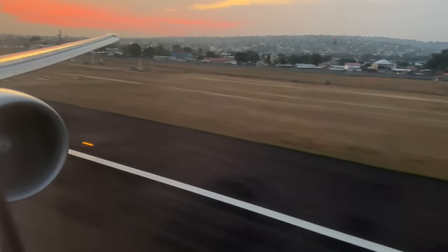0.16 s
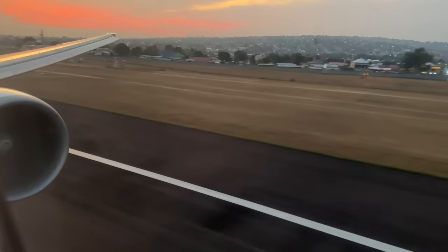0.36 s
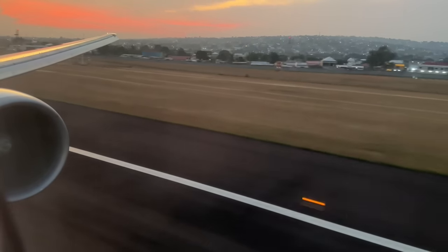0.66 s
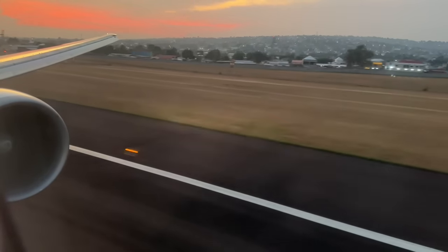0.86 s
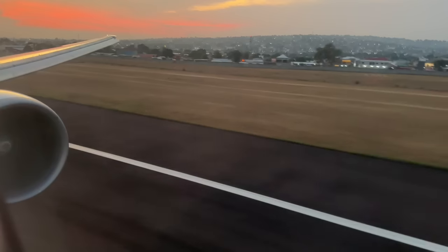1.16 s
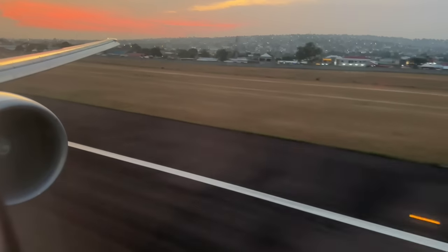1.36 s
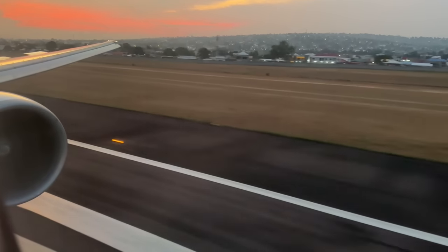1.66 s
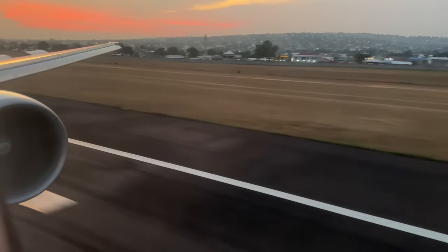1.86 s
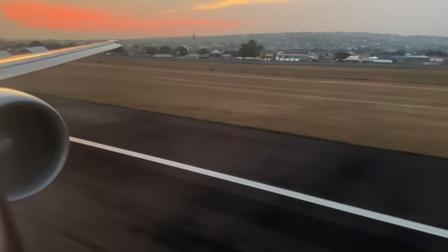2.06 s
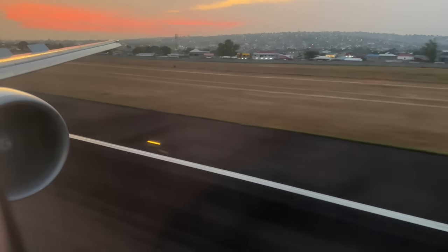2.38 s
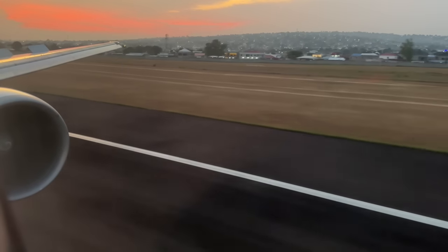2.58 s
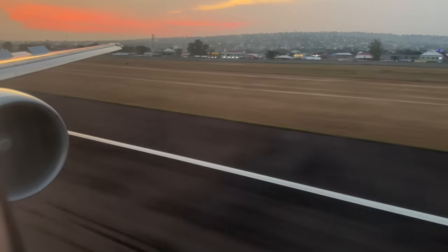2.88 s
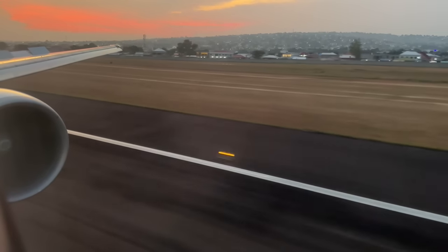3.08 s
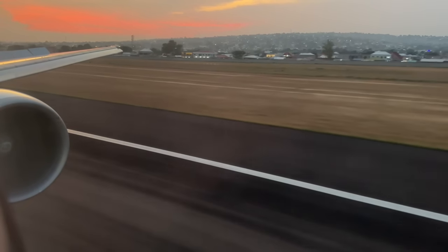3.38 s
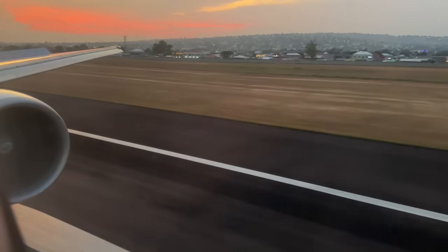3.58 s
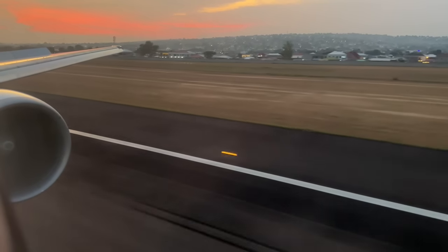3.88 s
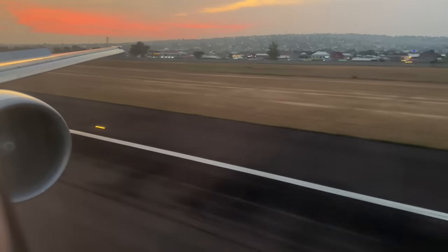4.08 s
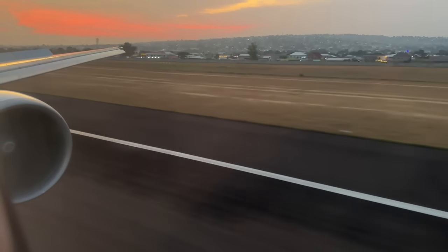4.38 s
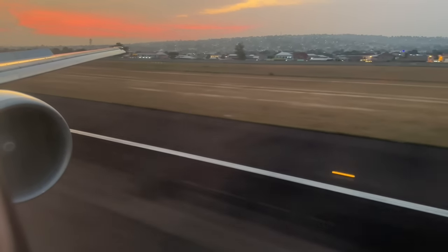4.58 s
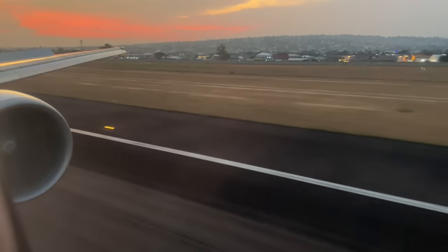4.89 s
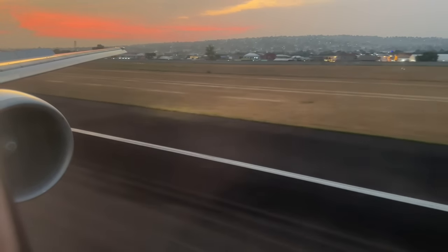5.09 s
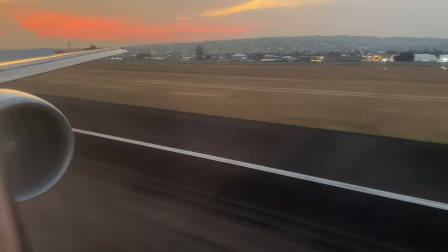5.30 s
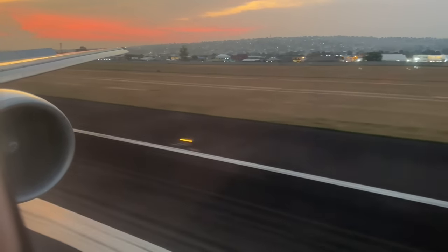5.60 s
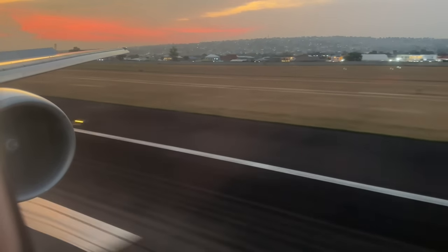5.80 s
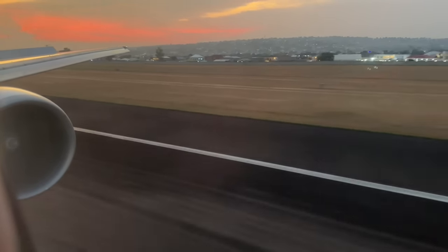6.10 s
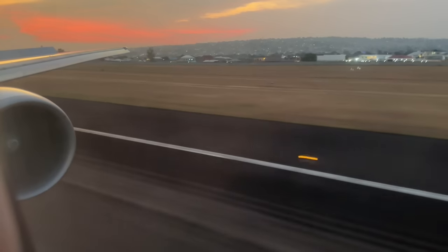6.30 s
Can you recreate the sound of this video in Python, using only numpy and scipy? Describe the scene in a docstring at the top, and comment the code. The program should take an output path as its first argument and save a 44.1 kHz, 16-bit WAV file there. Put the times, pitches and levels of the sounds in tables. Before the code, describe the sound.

A passenger jet rolls along the runway, heard from a window seat as a loud, steady low rumble with rushing air. Faint engine whines sink and fade over a thin electric tone and low hums. Plastic trim ticks, clacks and squeaks throughout. Early on, a rough stretch swells the rumble and rattling, then a loose panel knocks sharply once. Another rough stretch shakes the cabin near the end.

```python
"""Jet rollout from a window seat

After landing, the wheels rumble through the fuselage and air rushes by. The engine's whines sink and
fade over a steady electric tone and low hums. Rough stretches of runway swell the rumble and hiss and
make the cabin trim chatter, tick, clack and squeak. Once, a loose panel knocks sharply."""
import sys
import numpy as np
from scipy import signal
from scipy.fft import rfft, irfft, next_fast_len
from scipy.io import wavfile
from scipy.ndimage import uniform_filter1d, minimum_filter1d, map_coordinates

SR = 44100
rng = np.random.default_rng(int(sys.argv[2]) if len(sys.argv) > 2 else 0)


def put_to_file(sound):
    """Save the sound as 16-bit audio at rate SR, in the file named by the first command-line argument."""
    columns = np.atleast_2d(sound).T  # one column per channel
    safe = np.clip(columns, -1, 1)
    whole_steps = np.round(safe * 32767)
    wavfile.write(sys.argv[1], SR, whole_steps.astype(np.int16))


N = 284445
TOP_HZ = 15900

# stereo balance at the seat: f/Hz, left minus right/dB
BALANCE = [(60, -0.5), (110, -1), (200, -3), (380, -2), (700, -5.5), (1290, -7.5), (2380, -2), (4400, -9.5),
           (8120, -1), (15000, 1.5)]
# resonances of the plastic trim: f/Hz, width/Hz, gain/dB
PLASTIC_MODES = [(980, 170, 8), (1200, 160, 6), (1640, 220, 6), (2330, 120, -1), (2730, 400, -3),
                 (3900, 700, -5), (5500, 1500, -13), (8200, 1500, -20)]


def amp(db):
    """Decibels to gain."""
    return 10 ** (np.asarray(db) / 20)


def along(points, hz):
    """Read (f/Hz, value) points on a log axis."""
    f, v = np.transpose(points)
    return np.interp(np.log(hz + 1), np.log(f + 1), v)


def curves(rows):
    """One automation curve for each column after the time."""
    times, *cols = np.transpose(rows)
    return [np.interp(np.arange(N) / SR, times, col) for col in cols]


def swells(rows):
    """Smooth humps from rows of middle/s, half length/s, height."""
    t = np.arange(N) / SR
    return sum(height * np.exp(-((t - middle) / half) ** 2) for middle, half, height in rows)


def wobble(rate, size=N):
    """A smooth random curve, rate knots a second."""
    knots = rng.standard_normal(int(size * rate / SR) + 4)
    return map_coordinates(knots, [np.arange(size) * rate / SR])


def filtered(x, response):
    """Filter x with a complex response of frequency."""
    m = next_fast_len(N + SR // 2)
    return irfft(rfft(x, m) * response(np.fft.rfftfreq(m, 1 / SR)), m)[..., :N]


def ring(x, hz, q):
    """Pass x twice through one resonance."""
    b, a = signal.iirpeak(hz, q, fs=SR)
    return signal.lfilter(b, a, signal.lfilter(b, a, x))


def shell(x, modes):
    """Ring a plastic part: x drives its modes, which alternate in polarity."""
    return filtered(x, lambda hz: sum(
        (-1) ** k * amp(db) * 1j * hz * width / (centre ** 2 - hz ** 2 + 1j * hz * width)
        for k, (centre, width, db) in enumerate(modes)))


def add(track, s, sound):
    """Mix a sound into a track at time s."""
    part = track[:, max(round(s * SR), 0):][:, :sound.shape[-1]]
    part += sound[..., :part.shape[-1]]


def spread(pair, spectrum):
    """Colour a stereo pair and lean it mostly right; its mid comes out at rms 1."""
    def response(hz):
        db = along(spectrum, hz) + np.outer([.5, -.5], along(BALANCE, hz))
        return amp(db) * (hz < 2 * spectrum[-1][0])
    field = filtered(pair, response)
    return field / np.std(field.mean(0))


def low_noise(spectrum, evenness):
    """Low noise, nearly alike on both sides; evenness 0-1 steadies its slow chance swells."""
    # likeness of left and right: f/Hz, correlation
    likeness = [(60, .997), (130, .975), (290, .85), (420, .7)]
    def width(hz):
        angle = np.arccos(along(likeness, hz)) / 2
        return np.array([np.cos(angle), np.sin(angle)])
    mid, side = filtered(rng.standard_normal((2, N)), width)
    field = spread(np.array([mid + side, mid - side]), spectrum)
    power = np.abs(uniform_filter1d(field.mean(0) ** 2, size=SR // 7))
    return field / (power + 1e-9) ** (evenness / 2)


def in_cabin(sound, wet_db=-10, left_db=-3, lead_s=.00041):
    """A sound reaches the left microphone first, then scatters off seats and wall."""
    # cabin reverb decay: f/Hz, t60/s
    decay = [(300, 0.028), (4000, 0.22), (9000, 0.14), (15000, 0.0078)]
    hz, t, bands = signal.stft(rng.standard_normal((2, SR // 5)), SR, nperseg=256)
    tail = signal.istft(bands * amp(-60 * t / along(decay, hz)[:, None]), SR, nperseg=256)[1]
    paths = amp(wet_db) * tail / np.linalg.norm(tail[0])
    paths[0, 0] += 1
    paths[1, round(lead_s * SR)] += 1
    return signal.fftconvolve(sound[None], paths, axes=1) * amp([[left_db / 2], [-left_db / 2]])


def roughness():
    """How rough the runway is under the wheels: each stretch swells and passes."""
    # rough stretches: middle/s, half length/s, roughness (0 smooth, about 1 rough)
    patches = [(0.545, 0.14, 0.46), (1.29, 0.27, 0.84), (6.283, 0.17, 1.12)]
    return swells(patches)


def air(smooth_db=-38, rough_rise_db=4.5, fall_db_per_s=.03, direct=.35, lead_s=.00041):
    """Airflow and runway hiss fill the cabin; a part comes straight from the wall, left side first."""
    # colour of the rushing air: f/Hz, relative level/dB
    colour = [(240, -19.5), (400, -5.5), (540, -5.5), (983, -9), (1090, -14.5), (1330, -11), (1860, -20),
              (2120, -17), (2290, -20), (2580, -17.5), (3130, -24), (4750, -26.5), (6760, -37),
              (8110, -32.5), (9000, -37.5), (11700, -102), (19800, -120)]
    air_db = smooth_db - fall_db_per_s * np.arange(N) / SR + rough_rise_db * roughness()
    wall = rng.standard_normal(N)
    pair = rng.standard_normal((2, N)) + direct * np.array([wall, np.roll(wall, round(lead_s * SR))])
    gust_db = .6 * wobble(9)
    return amp(air_db + gust_db) * spread(pair, colour)


def electric_tone(hz=2158, trim_db=-1):
    """A thin electric tone holds its pitch and shimmers between the sides."""
    # the tone's fader ride: t/s, level before trim/dB
    ride = [(0, -53.5), (2.1, -53.5), (2.8, -51.5), (4.6, -54.5), (6.45, -53.5)]
    db = curves(ride)[0] + trim_db + 2 * wobble(8)
    shimmer_db = 2 * np.array([wobble(25), wobble(25)])
    phase = 2 * np.pi * hz * np.arange(N) / SR + .5 * wobble(22)
    return amp(db + shimmer_db) * np.sin(phase) * amp([[-1.5], [1.5]])


def engine_whines(fade_s=.063, waver_hz=7, flutter_db=1.8):
    """Engine tones flutter as they run down, cutting in and out."""
    # sinking whines: start/s, end/s, start f/Hz, end f/Hz, start level/dB, end level/dB
    glides = [(.3, 1.65, 4375, 4246, -55, -50), (2.15, 3.1, 4195, 4122, -51, -53),
              (-.1, .27, 3582, 3520, -41.5, -46), (.21, .53, 3522, 3503, -45, -49),
              (.33, 1.25, 3114, 3092, -45.5, -56), (.29, .68, 2720, 2710, -45, -49),
              (.7, 1.05, 2712, 2706, -53, -52), (2.4, 4.4, 2526, 2522, -58, -59)]
    t, out = np.arange(N) / SR, np.zeros((2, N))
    for start, end, from_hz, to_hz, from_db, to_db in glides:
        hz = np.interp(t, [start, end], [from_hz, to_hz])
        phase = 2 * np.pi * np.cumsum(hz + waver_hz * wobble(60)) / SR
        gate = np.clip(np.minimum(t - start, end - t) / fade_s, 0, 1)
        db = np.interp(t, [start, end], [from_db, to_db]) + flutter_db * wobble(45)
        for ear in range(2):
            out[ear] += amp(db + wobble(30)) * gate * np.sin(phase + ear * hz / 3000)
    return out * amp([[-1.5], [1.5]])


def hums(waver_db=2):
    """Clean low tones swell and fade in the fuselage as the jet slows."""
    # fuselage tones: start/s, loudest/s, end/s, start f/Hz, end f/Hz, level/dB
    tones = [(-2, .4, 2.3, 350, 346, -29.5), (-.2, .4, .95, 400, 394, -36),
             (1.55, 1.95, 2.7, 277, 277, -26), (1.9, 2.4, 2.8, 296, 295, -30),
             (2.6, 3.7, 4.2, 277, 270, -30), (2.5, 3.2, 3.7, 401, 400, -37.5),
             (2.9, 3.35, 3.7, 386, 383, -35.5), (3.7, 4.15, 4.5, 362, 359, -34),
             (4.0, 4.75, 5.2, 252, 251, -30)]
    t, out = np.arange(N) / SR, np.zeros(N)
    for start, loudest, end, from_hz, to_hz, db in tones:
        phase = 2 * np.pi * np.cumsum(np.interp(t, [start, end], [from_hz, to_hz])) / SR
        swell = np.sin(np.pi / 2 * np.interp(t, [start, loudest, end], [0, 1, 0]))
        out += amp(db + waver_db * wobble(11)) * swell * np.sin(phase)
    return out * amp([[-1.2], [1.2]])


def shaking(smooth_db=-53.5, rough_rise_db=3.5, flicker_db=3, attack_s=.012, fall_db_per_s=183):
    """The trim trembles unevenly, more on rough runway; a rattle starts fast, holds and dies away."""
    # fits of rattling: t/s, hold/s, level/dB
    rattles = [(0.639, 0.036, -46.5), (1.104, .093, -45), (1.317, 0.017, -41.5), (1.44, 0.091, -52),
               (1.942, 0.053, -41), (3.061, 0.035, -47), (3.299, .15, -46), (5.124, .1, -44.5),
               (6.131, 0.079, -41), (6.318, 0.1, -42.5)]
    t = np.arange(N) / SR
    power = amp(smooth_db + rough_rise_db * roughness() + flicker_db * wobble(14)) ** 2
    for s, hold, db in rattles:
        attack = np.clip((t - s) / attack_s + 1, 0, 1)
        fall_db = fall_db_per_s * np.maximum(t - s - hold, 0)
        power += (attack * amp(db - fall_db)) ** 2
    return np.sqrt(power)


def chatter(contacts_per_s=900, size_db=6, ring_db=-6):
    """Countless tiny contacts in the trim, as loud as the shaking that drives them."""
    # colour of the contacts: f/Hz, relative level/dB
    colour = [(350, -28.5), (650, 7), (1300, 17), (1900, 2), (2600, 2), (3500, 0), (4750, 1.5), (6500, -2),
              (9000, -23), (10500, -27), (13500, -11.5), (16000, -43)]
    hits = rng.random(N) < contacts_per_s / SR
    sizes = amp(size_db * np.minimum(rng.exponential(size=N), 3))
    contacts = in_cabin(hits * sizes * rng.choice([-1, 1], N), wet_db=-3, left_db=0)[:, :N]
    ringing = shell(contacts, PLASTIC_MODES)
    ringing *= amp(ring_db) / np.sqrt(np.mean(ringing ** 2))
    return shaking() * (spread(contacts, colour) + ringing * amp([[-1.5], [1.5]]))


def ticks(t60_s=.042, q=2.64):
    """Small hard edges of the trim snap against each other and stop at once."""
    # dry ticks: t/s, level before the resonance/dB, f/Hz
    snaps = [(.537, -29.5, 6340), (.581, -41, 5540), (.634, -27.5, 5570), (.877, -31, 5550),
             (1.059, -27, 6330), (1.068, -24.5, 4900), (1.113, -29, 6000), (1.333, -28.5, 6770),
             (1.339, -34, 4600), (1.513, -42.5, 7250), (1.496, -44, 13500), (1.741, -43, 13000),
             (1.82, -26.5, 4500), (1.944, -32, 6000), (3.645, -29, 5000), (3.706, -25, 5000),
             (3.962, -33.5, 5700), (5.28, -36, 6500), (5.697, -26.5, 4980), (6.143, -35.5, 5950),
             (6.153, -25, 5630), (6.298, -32, 6200)]
    out, t = np.zeros((2, N)), np.arange(SR // 10) / SR
    for s, db, hz in snaps:
        snap = amp(db - 60 * t / t60_s) * rng.standard_normal(len(t))
        add(out, s, in_cabin(ring(snap, hz, q)))
    return out


def faint_slips(smooth_per_s=2, rough_extra_per_s=6, detune=.017, slip_s=.021, candidates=200):
    """Cue rows for small chance squeaks, crowding on the rough stretches."""
    # pitches that the faint squeaks gather round: f/Hz
    pitches = [7750, 8050, 8300, 8500]
    when, chance = rng.random((2, candidates))
    rate = smooth_per_s + rough_extra_per_s * roughness()[(when * N).astype(int)]
    hz = rng.choice(pitches, candidates) * (1 + detune * rng.standard_normal(candidates))
    db = -48.5 + 3.5 * rng.standard_normal(candidates)
    rows = np.transpose([when * N / SR, hz, db, np.full(candidates, slip_s)])
    return rows[chance < rate * N / SR / candidates]


def squeaks(waver_hz=48, boost_db=2, scrape_db=-32, flutter_db=3.5):
    """Plastic edges catch, slip and sing unsteadily; the low ones are coarse and rich in overtones."""
    # clear squeaks: t/s, f/Hz, peak before boost/dB, slip length/s
    slips = [(.3, 8050, -48, 0.017), (.362, 7930, -37, .03), (.452, 8920, -32, 0.019),
             (.464, 4730, -39, 0.015), (.505, 8560, -32, 0.02), (.558, 8960, -31.5, 0.017),
             (.886, 8200, -41, .03), (.914, 8000, -37, 0.015), (1.0, 8400, -40.5, 0.028),
             (1.105, 9040, -21, 0.026), (1.118, 4740, -35.5, .02), (1.166, 3920, -31.5, 0.039),
             (1.168, 7820, -43.5, 0.014), (1.176, 5830, -38, .026), (1.18, 4720, -32.5, 0.051),
             (1.204, 7790, -37, 0.036), (1.254, 9200, -30.5, 0.013), (1.282, 4730, -28, 0.017),
             (1.287, 8150, -31.5, 0.026), (1.43, 8800, -27, 0.024), (1.458, 8860, -33.5, 0.017),
             (1.598, 3820, -32, 0.022), (1.6, 7800, -45.5, 0.058), (1.727, 4550, -30, 0.023),
             (1.745, 7570, -43.5, .016), (1.984, 4680, -35.5, 0.03), (2.001, 7850, -27, 0.054),
             (2.079, 8970, -28.5, 0.021), (2.338, 7710, -32.5, 0.048), (2.378, 8020, -35.5, 0.033),
             (2.47, 9220, -31.5, 0.021), (2.7, 7970, -34, 0.045), (2.83, 8970, -28, 0.014),
             (2.922, 7590, -36.5, 0.023), (3.057, 7805, -29.5, .035), (3.2, 9270, -35, 0.015),
             (3.3, 7760, -32.5, 0.031), (3.665, 4630, -36, 0.017), (3.725, 8000, -42.5, .02),
             (3.817, 5910, -39, 0.017), (3.852, 7870, -36, .04), (4.022, 5860, -37.5, 0.018),
             (4.078, 7890, -42, 0.049), (4.132, 7700, -35.5, .012), (4.265, 5870, -33, 0.028),
             (4.358, 7720, -35, 0.017), (4.383, 8000, -36, 0.02), (4.543, 4700, -35, 0.028),
             (4.576, 8070, -32, 0.026), (4.69, 7920, -46, .022), (4.83, 4650, -40.5, .014),
             (4.857, 7880, -39.5, 0.049), (4.987, 8050, -44, 0.022), (5.485, 7700, -46, .014),
             (5.587, 4670, -43, 0.021), (6.068, 8430, -40, 0.02), (6.184, 4800, -35.5, 0.012),
             (6.208, 8440, -35, 0.024), (6.298, 7880, -34.5, 0.016), (6.33, 5000, -38.5, 0.012),
             (6.36, 6020, -32.5, 0.0088), (6.41, 4800, -37, 0.01)]
    # how coarsely the edges slip: f/Hz, factor on waver and scrape
    coarseness = [(4700, 2.0), (5900, 1), (8000, 1.1)]
    # how the trim radiates overtones: f/Hz, level against the fundamental/dB
    radiation = [(8000, -9), (9400, -11), (11800, -25), (14000, -23.5), (15800, -25.5)]
    # each edge has its own pitch and place: f/Hz, lead of the left microphone/s
    leads = [(4700, .00041), (5900, .00035), (7700, .00039)]
    out = np.zeros((2, N))
    for s, hz, db, slip_s in [*slips, *faint_slips()]:
        n = int(slip_s * SR)
        progress = np.arange(n) / n
        coarse = along(coarseness, hz)
        phase = 2 * np.pi * np.cumsum(hz + coarse * waver_hz * wobble(600, size=n)) / SR
        grip = np.sin(np.pi * progress ** .57) * amp(flutter_db * wobble(280, size=n))
        scrape = coarse * amp(scrape_db) * (1 - progress) * rng.standard_normal(n)
        orders = range(2, int(TOP_HZ / hz) + 1)
        overtones = sum(amp(along(radiation, k * hz)) * np.sin(k * phase) for k in orders)
        tone = grip * (np.sin(phase) + overtones + scrape)
        heard = in_cabin(tone, wet_db=-11, left_db=along(BALANCE, hz) / 2, lead_s=along(leads, hz))
        add(out, s, amp(db + boost_db) * heard / np.abs(heard).max())
    return out


def clacks(q=3.1):
    """Loose fittings strike and buzz to rest, each ringing the plastic shell and a pitch of its own."""
    # fittings striking: t/s, level before the resonances/dB, t60/s, own f/Hz
    fittings = [(.535, -28.5, .05, 2200), (0.578, -25.5, 0.045, 1280), (1.113, -21.5, 0.08, 2070),
                (1.165, -25, .06, 1400), (1.205, -22, 0.1, 2080), (1.266, -26, 0.041, 1700),
                (1.301, -29, 0.046, 2900), (1.433, -25, 0.044, 1800), (1.491, -25.5, .05, 1470),
                (1.515, -24, .05, 1580), (1.765, -28, .06, 1400), (3.075, -29.5, .06, 2300),
                (3.305, -26.5, 0.084, 1400), (3.37, -25.5, 0.055, 1400), (3.64, -25, .07, 1400),
                (3.703, -23.5, 0.055, 1450), (4.437, -23.5, 0.07, 1400), (4.54, -25.5, 0.098, 1350),
                (4.61, -29.5, .08, 1350), (4.718, -25, 0.09, 1500), (5.697, -28, .06, 1500),
                (5.9, -28, 0.072, 1800), (6.127, -22.5, .06, 2300), (6.144, -20, 0.06, 1500),
                (6.191, -24, .06, 1360), (6.253, -24, 0.048, 2300), (6.317, -23, 0.05, 2750),
                (6.35, -23.5, 0.05, 1400), (6.386, -25, 0.05, 1410)]
    strikes, own_ring = np.zeros((2, N)), np.zeros((2, N))
    t = np.arange(SR // 5) / SR
    for s, db, t60, hz in fittings:
        buzz = amp(db - 60 * t / t60) * rng.standard_normal(len(t))
        heard = in_cabin(buzz, left_db=-4, lead_s=rng.uniform(.0002, .0006))
        add(strikes, s, heard)
        add(own_ring, s, ring(heard, hz, q))
    return shell(strikes, PLASTIC_MODES) + own_ring


def knock(buzz_db=-19):
    """A loose panel slaps home once, with a solid body and a brief buzz."""
    # the slap: t/s, peak/dB, t60 of the buzz/s
    slap = (1.862, -11, 0.053)
    # the panel's resonances: f/Hz, width/Hz, relative gain/dB
    panel_modes = [(956, 260, 3.5), (1225, 260, 2), (1610, 300, -0.5), (2150, 260, 2.5), (2660, 350, 0.5),
                   (3950, 500, -4), (4880, 1000, -10), (7300, 1600, -14.5), (13400, 2000, -31)]
    s, db, t60 = slap
    out, t = np.zeros((2, N)), np.arange(SR // 10) / SR
    blow = amp(buzz_db - 60 * t / t60) * rng.standard_normal(len(t))
    blow[0] += 1  # the impact itself
    add(out, s, in_cabin(blow, lead_s=.00074))
    body = shell(out, panel_modes)
    return amp(db) * body / np.abs(body).max()


def rumble(heave_db=-29, tread_db=-44, tread_growth=1.4, rough_rise_db=1):
    """The runway heaves the airframe, the tyres rumble and roar, and the wall panels drone along."""
    # the roll slowly builds: t/s, tyre level on smooth runway/dB, panel drone level/dB
    roll = [(0, -18.5, -28.5), (.3, -18, -30.5), (1.6, -17.5, -29.5), (1.9, -16.5, -27.5),
            (2.2, -16.5, -29), (3.5, -16, -28), (4.4, -16, -26.5), (5.2, -12.5, -24), (5.8, -13.5, -25),
            (6.45, -14, -26)]
    # bumps that heave the airframe: middle/s, half length/s, rise/dB
    bumps = [(1.35, 0.17, 11.5), (5.55, 0.18, 1), (6.17, .14, 10.5)]
    # colours of airframe heave, tyre rumble, tread roar and panel drone: f/Hz, relative level/dB
    heave_colour = [(12, -20), (22, -12), (32, -6.5), (48, 1.5), (58, -4.5), (80, -40.5)]
    tyre_colour = [(35, -35.5), (52, -11), (71, 2), (84, -4), (100, 1), (116, -4.5), (138, 0), (162, -5),
                   (190, -4), (212, -11.5), (240, -17.5), (400, -53.5)]
    tread_colour = [(330, -30), (440, 4), (620, -1.5), (800, -6.5), (1200, -39.5)]
    drone_colour = [(190, -43), (235, -13.5), (255, 1.5), (280, 0.5), (325, -1.5), (365, -7), (398, -10),
                    (418, -19.5), (445, -15), (510, -22.5), (600, -46)]
    tyre_db, drone_db = curves(roll)
    rough_db = rough_rise_db * roughness()
    swell_db = tyre_db - tyre_db.mean()
    heave = amp(heave_db + swell_db + swells(bumps)) * low_noise(heave_colour, evenness=.86)
    tyres = amp(tyre_db + rough_db) * low_noise(tyre_colour, evenness=.7)
    tread = amp(tread_db + tread_growth * swell_db + rough_db) * low_noise(tread_colour, evenness=.35)
    panels = amp(drone_db) * low_noise(drone_colour, evenness=.68)
    return heave + tyres + tread + panels


def scene():
    """The mix at the seat: a bed of rumble, air and tones, with the trim's noises on top."""
    bed = rumble() + air() + engine_whines() + electric_tone() + hums()
    return bed + chatter() + clacks() + knock() + ticks() + squeaks()


def record(dry, ceiling=.69):
    """A limiter holds the largest swings; nothing is kept above the band limit."""
    needed = np.minimum(1, ceiling / (np.abs(dry).max(0) + 1e-9))
    gain = uniform_filter1d(minimum_filter1d(needed, size=600), size=300)
    return filtered(dry * gain, lambda hz: hz < TOP_HZ)


dry = scene()
out = record(dry)
put_to_file(out)
```